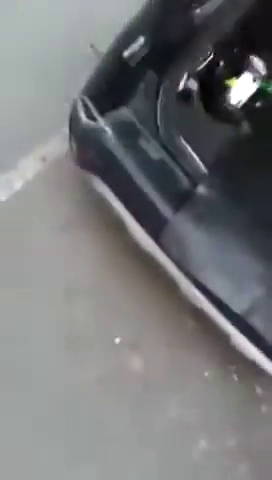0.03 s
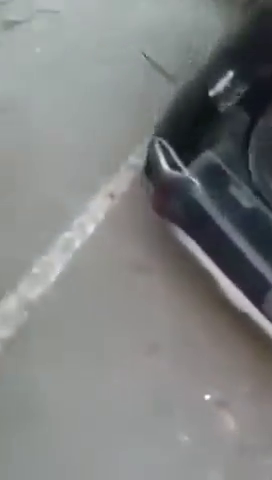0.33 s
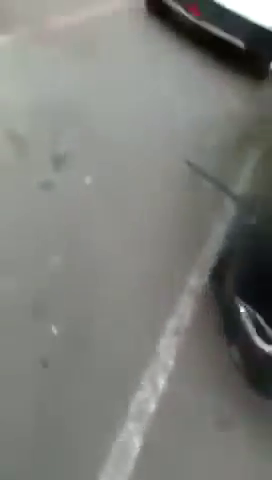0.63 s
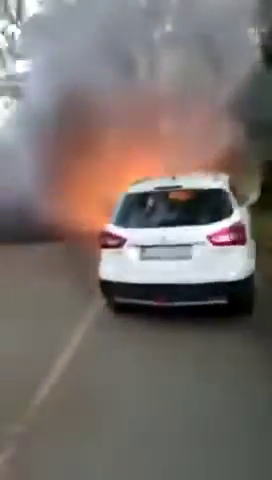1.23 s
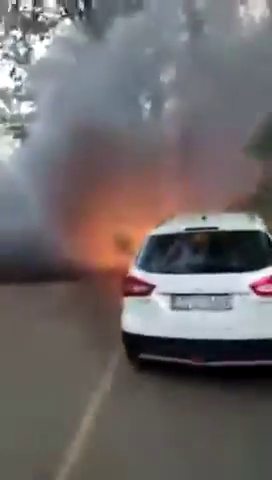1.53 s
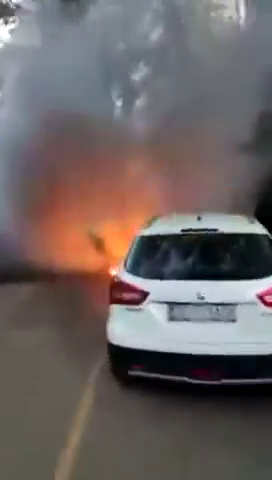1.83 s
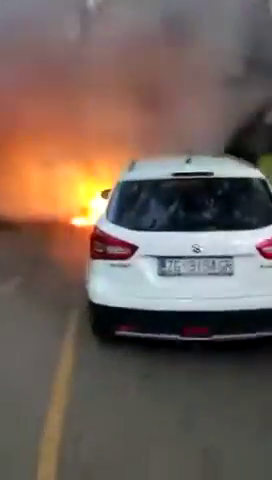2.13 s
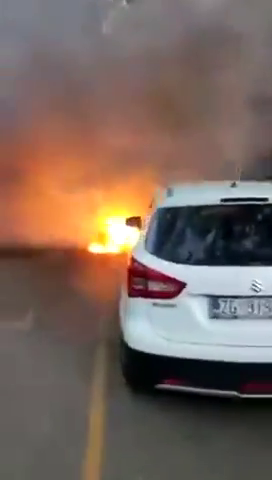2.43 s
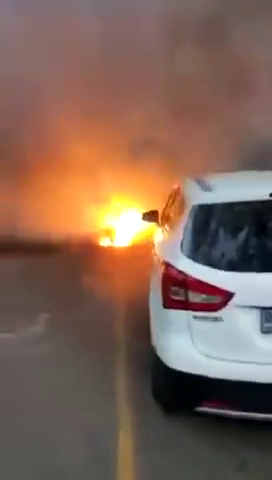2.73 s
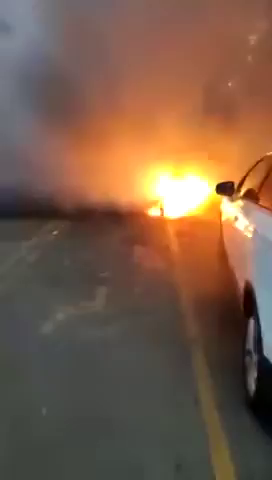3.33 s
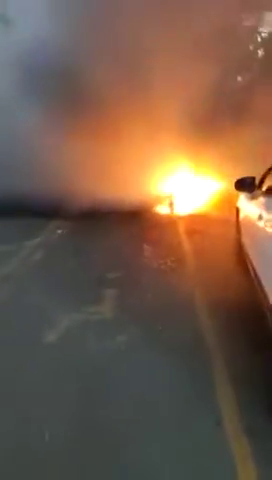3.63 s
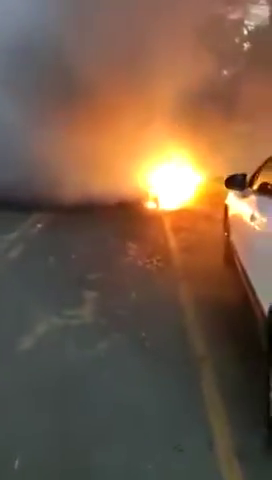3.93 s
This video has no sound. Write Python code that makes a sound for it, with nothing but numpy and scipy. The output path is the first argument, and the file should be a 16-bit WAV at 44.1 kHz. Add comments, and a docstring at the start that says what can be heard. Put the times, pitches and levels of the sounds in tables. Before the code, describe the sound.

A large fire burns outdoors, starting as a steady, bright hiss with fine crackle. From about 2 seconds a hollow, fluttering roar of flames swells, strongest around 3.3 seconds, while the hiss fades. Wind buffets the hand-held microphone with low rumble and thumps, hardest at the very start and returning from 0.8 seconds. Faint pops come from the fire at about 1.2, 3.3 and 3.8 seconds.

```python
"""Fire in a car park

A large fire, heard from a hand-held phone that moves toward it past a parked car. A steady hiss
fades as the hollow roar of the turbulent flames comes into the open. Gusts of air buffet the
microphone with low eddies and a few thumps, and now and then something pops in the fire."""
import sys
import numpy as np
from scipy import signal
from scipy.fft import rfft, irfft
from scipy.io import wavfile
from scipy.ndimage import map_coordinates

SR = 44100
rng = np.random.default_rng(int(sys.argv[2]) if len(sys.argv) > 2 else 0)


def store_wav(level_fs):
    """Save 16-bit WAV to argv[1]."""
    pcm = np.round(np.clip(np.atleast_2d(level_fs), -1, 1) * 32767)
    wavfile.write(sys.argv[1], SR, pcm.T.astype(np.int16))


N = 176400  # 4 s


def undb(db):
    """Decibels to gain."""
    return 10 ** (np.asarray(db) / 20)


def curve(rows):
    """Straight lines through (s, value) rows, one value a sample."""
    return np.interp(np.arange(N) / SR, *np.array(rows, float).T)


def unit(x):
    """Scale to rms 1."""
    return x / np.sqrt(np.mean(x ** 2))


def colour(x, points):
    """Filter by a (Hz, dB) outline; rms 1."""
    hz, db = np.array(points, float).T
    f = np.maximum(np.fft.rfftfreq(len(x), 1 / SR), 1)
    gain = undb(np.interp(np.log(f), np.log(hz), db))
    return unit(irfft(rfft(x) * gain, len(x)))


def walk(rate_hz):
    """Smooth random wander; rms 1."""
    f = np.fft.rfftfreq(N, 1 / SR) / rate_hz
    return unit(irfft(rfft(rng.standard_normal(N)) * f / (1 + f ** 2) ** 2, N))


def impulses(per_s, size):
    """Impulses of either sign at random moments."""
    return (rng.random(size) < per_s / SR) * np.sign(rng.standard_normal(size))


def band(hz, width_hz):
    """Noise in one resonance; rms 1."""
    f = np.maximum(np.fft.rfftfreq(N, 1 / SR), 1)
    detuning = (f - hz ** 2 / f) / width_hz
    return unit(irfft(rfft(rng.standard_normal(N)) / (1 + detuning ** 2), N))


def waver(x, share, rate_hz):
    """Let all frequencies of a sound wander by a share of their value."""
    return map_coordinates(x, [np.cumsum(1 + share * walk(rate_hz))], order=3, mode="mirror")


def scuff(centre_s=0.654, length_s=0.091):
    """A faint, brief scrape in the lull between gusts."""
    swell = np.exp(-((np.arange(N) / SR - centre_s) / length_s) ** 2)
    return band(1540, width_hz=590) * swell * undb(-35)


def jet():
    """A thin, late hiss, perhaps a small leak in the burning car."""
    # Each row: time in seconds, level in dB.
    level = [(3.1, -63), (3.25, -39), (3.62, -42), (3.8, -53), (4, -50)]
    return band(4590, width_hz=160) * undb(curve(level))


def rumble(flicker_db=1.5):
    """Large slow eddies at the microphone, deep under the buffeting."""
    # Each row: time in seconds, level in dB.
    level = [(0, -29), (.1, -24), (.15, -31), (.4, -40.5), (.56, -35), (.63, -48), (.9, -33.5),
             (1.6, -29.5), (2.1, -28), (2.4, -36), (2.7, -33), (3.1, -41), (4, -49)]
    # Each row: frequency in Hz, relative level in dB.
    spectrum = [(15, -14.5), (35, -5.5), (55, -3), (78, 2), (108, 0), (200, -16), (1000, -69)]
    return colour(rng.standard_normal(N), spectrum) * undb(curve(level) + flicker_db * walk(6.1))


def buffet(gain_db=1, flicker_db=0.7):
    """Low eddies tumble past the microphone; a quicker stream makes them shorter and higher."""
    # The gusts. Each row: time in seconds, relative level in dB.
    level = [(0, -28), (.05, -25), (.065, -18.5), (.115, -17.5), (.13, -20), (.22, -24.5), (.31, -25),
             (.335, -36), (.6, -31), (.8, -36), (.85, -21.5), (.99, -19), (1.07, -24), (1.25, -20),
             (1.36, -29.5), (1.42, -21.5), (1.57, -32.5), (1.615, -20.5), (1.69, -35.5), (1.73, -24),
             (1.79, -23), (1.85, -17.5), (1.92, -24), (2.18, -18), (2.35, -21.5), (2.62, -20.5),
             (2.72, -20.5), (2.85, -22.5), (3.35, -19.5), (3.72, -22), (3.82, -27.5), (4, -24)]
    # Each row: frequency in Hz before the shift, relative level in dB.
    spectrum = [(20, -21.5), (45, -16.5), (95, -9.5), (145, -0.5), (185, 1.5), (225, -2.5), (290, -2.5),
                (380, -6.5), (550, -13.5), (800, -23), (1400, -27.5), (4000, -63)]
    # The quickening air. Each row: time in seconds, upward shift in octaves.
    shift = [(0, 0.0021), (1, 0.042), (1.55, 0), (2.2, .12), (2.8, .08), (3.4, .05), (4, .12)]
    eddies = colour(impulses(per_s=1400, size=2 * N), spectrum)
    travel = np.cumsum(2 ** curve(shift))
    passing = map_coordinates(eddies, [travel], order=1, mode="mirror")
    return unit(passing * undb(flicker_db * walk(15))) * undb(curve(level) + gain_db)


def thumps(wobble=0.11, rise_s=0.0016):
    """Single strong eddies hit the microphone: a few uneven low swings of pressure that die at once."""
    # Each row: start in seconds, level in dB, pitch in Hz, length in seconds.
    hits = [(.06, -1, 178, 0.018), (.064, -10.5, 320, 0.022), (0.085, -4.5, 82.5, 0.0078),
            (.097, -8, 188, .02), (.099, -10, 315, .014), (.116, -2.5, 148, 0.0061),
            (.305, -10.5, 182, 0.011), (0.84, -6.5, 169, 0.0088), (.939, -13, 202, 0.015),
            (0.992, -14, 299, .018), (1.161, -7, 186, 0.011), (1.608, -13, 133, 0.0094),
            (1.831, -11, 219.4, 0.01), (2.165, -14.5, 259.4, 0.023), (2.698, -9.5, 327, 0.032),
            (2.718, -13, 213, 0.023), (3.009, -16, 316, 0.017)]
    out, t = np.zeros(N), np.arange(N) / SR
    drift = 1 + wobble * walk(140)
    for start, db, hz, length in hits:
        age = np.maximum(t - start, 0)
        swing = np.sin(2 * np.pi * np.cumsum(hz * drift * (age > 0)) / SR)
        envelope = (1 - np.exp(-age / rise_s)) * np.exp(-(age / length) ** 2)
        out -= undb(db) * swing * envelope
    return out


def pops(rise_s=0.0007, boom_decay_s=0.028):
    """Something bursts in the fire: a short puff in one broad resonance, with a duller boom."""
    # Each row: start in seconds, level in dB, centre in Hz, width in Hz, decay in seconds.
    bursts = [(1.237, -18.5, 1730, 520, .005), (3.216, -24.5, 1300, 701, 0.041),
              (3.296, -9.5, 646, 330, 0.0042), (3.345, -16, 1330, 3000, .008),
              (3.777, -14.5, 574, 300, .004)]
    out, t = np.zeros(N), np.arange(N) / SR
    boom = undb(-8) * band(600, width_hz=470)
    for start, db, hz, width, decay in bursts:
        age = np.maximum(t - start, 0)
        rise = 1 - np.exp(-age / rise_s)
        envelope = rise * np.exp(-age / decay)
        puff = band(hz, width) * envelope / envelope.max()
        out += undb(db) * (puff + boom * rise * np.exp(-age / boom_decay_s))
    return out


def hiss(gain_db=0.4, flicker_db=0.9, edge_hz=8800, edge_flicker_db=4):
    """A rush, perhaps of escaping gas or steam, with a flickering, whistling edge and a fine crackle."""
    # Each row: time in seconds, relative level in dB.
    level = [(0, -25), (.07, -25.5), (.5, -22.5), (.8, -23), (1.28, -24), (1.37, -22), (1.65, -21.5),
             (1.95, -21), (2.25, -24.5), (2.7, -25.5), (3.19, -27), (3.45, -25.5), (3.72, -28.5),
             (3.82, -34), (3.9, -32), (4, -33.5)]
    # Each row: frequency in Hz, relative level in dB.
    spectrum = [(300, -18), (1050, -11.5), (1500, -8), (3000, -6.5), (4200, -5.5), (5600, -3), (6750, -1.5),
                (7080, 0.5), (7500, -2), (8000, -3), (8800, -6.5), (9400, -45.5)]
    rush = colour(rng.standard_normal(N), spectrum) * undb(flicker_db * walk(16))
    edge = signal.sosfiltfilt(signal.butter(4, edge_hz, "high", fs=SR, output="sos"), rush)
    rush += edge * (undb(edge_flicker_db * walk(18)) - 1)  # the top flickers on its own
    whistle = waver(band(7440, width_hz=330), share=0.005, rate_hz=5)
    whistle *= undb(-9 + 1.1 * walk(11))
    crackle = undb(-13) * colour(impulses(per_s=1000, size=N), spectrum)
    return (rush + whistle + crackle) * undb(curve(level) + gain_db)


def roar(gain_db=1.5, flicker_db=0.8):
    """Turbulent flames coming into the open: a fluttering rush with two resonances and a sizzle."""
    # How each part swells. Each row: time in seconds, relative level in dB.
    flame_level = [(0, -43), (.8, -46), (1.3, -35), (1.85, -31.5), (2.35, -30), (2.62, -25), (2.74, -23),
                   (3.05, -22.5), (3.3, -22.5), (3.5, -25), (3.7, -26), (3.82, -29), (4, -28)]
    throat_level = [(0, -51), (2.3, -40), (2.9, -32), (3.3, -22.5), (3.65, -22), (3.82, -26), (4, -24.5)]
    hollow_level = [(0, -43), (1.7, -38.5), (2.05, -22), (2.19, -18.5), (2.33, -27.5), (2.58, -23),
                    (2.8, -31), (3.1, -40), (4, -38)]
    sizzle_level = [(0, -50), (1.2, -46.5), (1.45, -48), (1.65, -35), (2.05, -35.5), (2.3, -38.5),
                    (2.52, -35.5), (2.62, -31), (2.78, -31.5), (2.87, -36), (3.02, -36), (3.3, -40),
                    (3.62, -36), (3.8, -42), (4, -39)]
    # The rush and its throaty resonance. Each row: frequency in Hz, relative level in dB.
    flame_spectrum = [(80, -19.5), (200, -1.5), (400, 0), (520, 2), (640, 0), (780, -1), (930, -1),
                      (1200, -10), (1380, -5.5), (1700, -15), (2250, -10), (3100, -29.5), (5000, -33),
                      (9000, -52)]
    throat_spectrum = [(250, -40.5), (440, -14), (530, -1), (610, 4), (710, -2), (830, -10), (1300, -41.5),
                       (4000, -67.5)]
    flames = colour(rng.standard_normal(N), flame_spectrum) * undb(curve(flame_level))
    throat = waver(colour(rng.standard_normal(N), throat_spectrum), share=0.0249, rate_hz=2.95)
    throat *= undb(curve(throat_level))  # strongest once the flames are in plain view
    hollow = band(255, width_hz=35) * undb(curve(hollow_level))
    sizzle = waver(band(2300, width_hz=690), share=0.04, rate_hz=3) * undb(curve(sizzle_level))
    flutter = undb(gain_db + flicker_db * walk(23))
    return (flames + throat) * flutter + hollow + sizzle


def scene():
    """Fire and wind reach one microphone, the same in both channels."""
    mono = hiss() + jet() + roar() + buffet() + rumble() + thumps() + pops() + scuff()
    return np.array([mono, mono])


def record(dry):
    """The phone clips at full scale and cuts the treble above 9200 Hz."""
    lowpass = signal.ellip(12, 0.1, 85, 9200, fs=SR, output="sos")
    return signal.sosfilt(lowpass, np.clip(dry, -1, 1))


dry = scene()
out = record(dry)
store_wav(out)
```